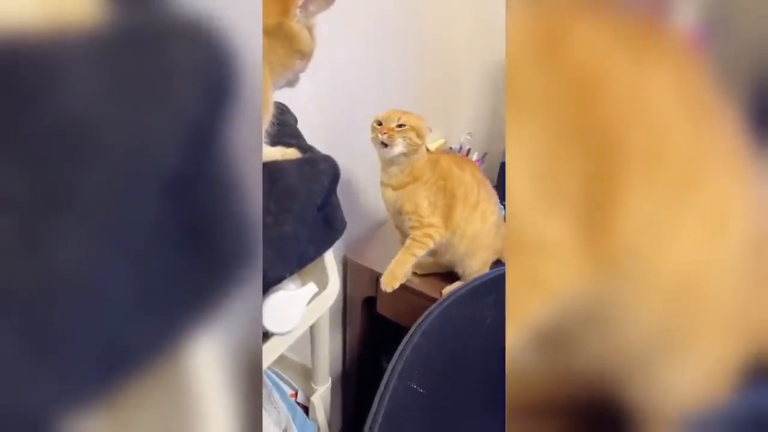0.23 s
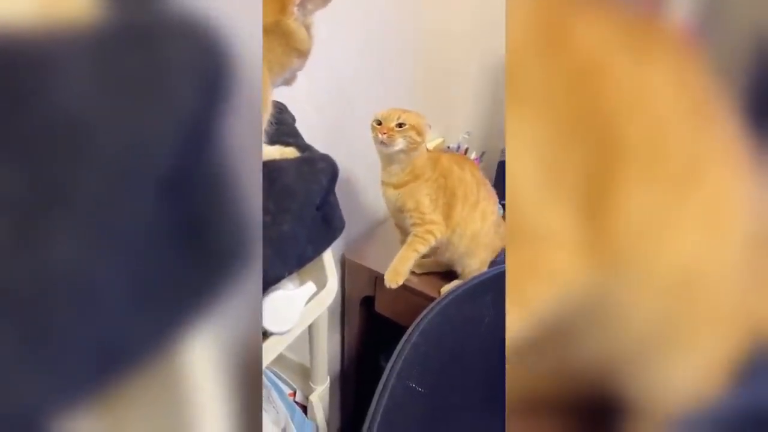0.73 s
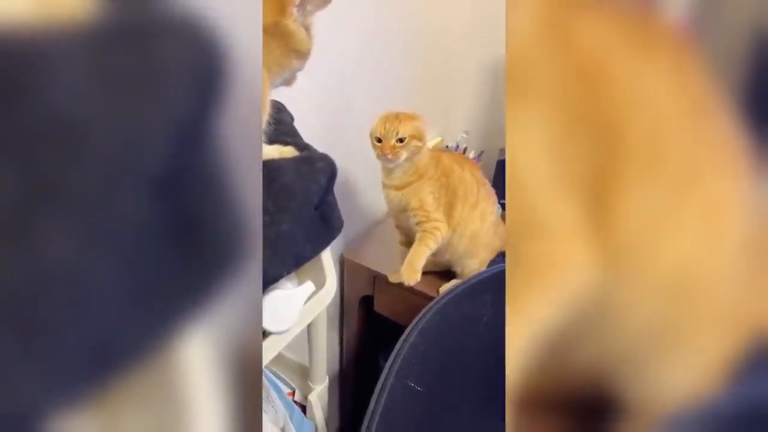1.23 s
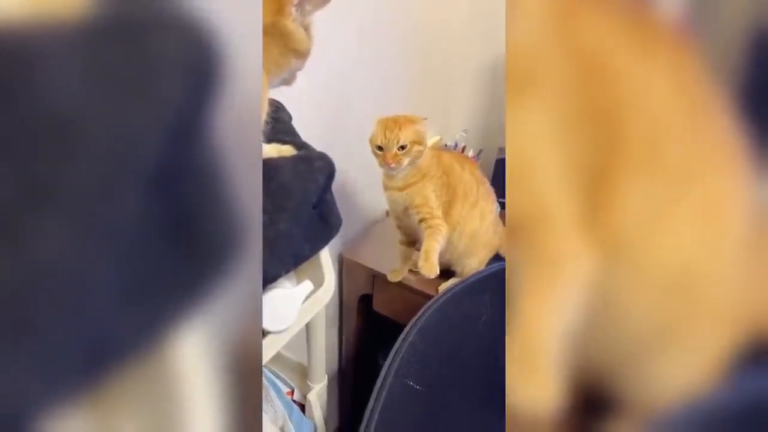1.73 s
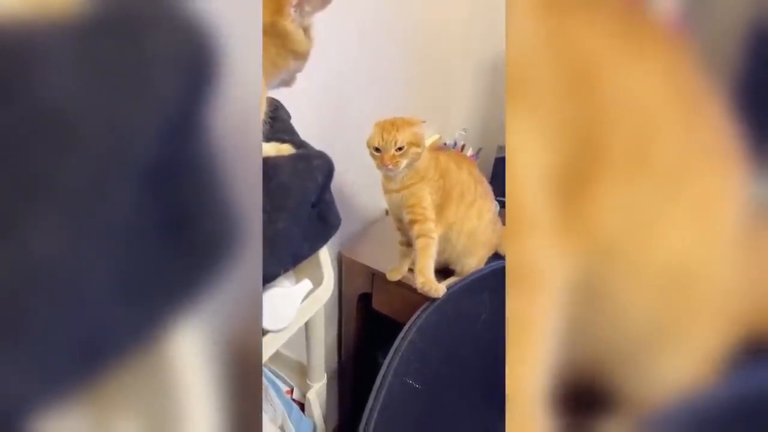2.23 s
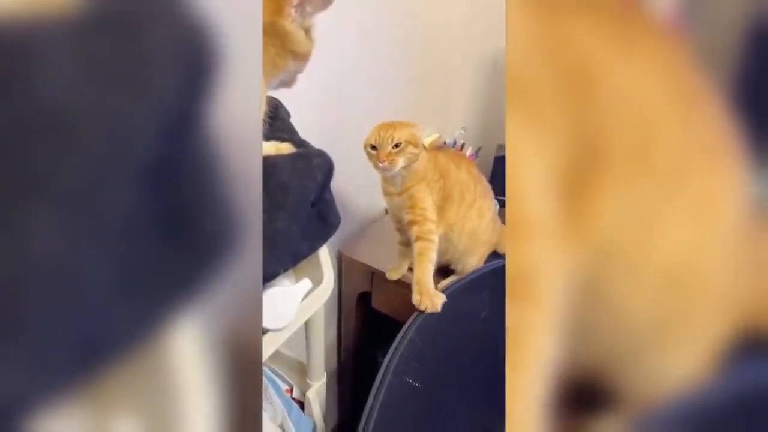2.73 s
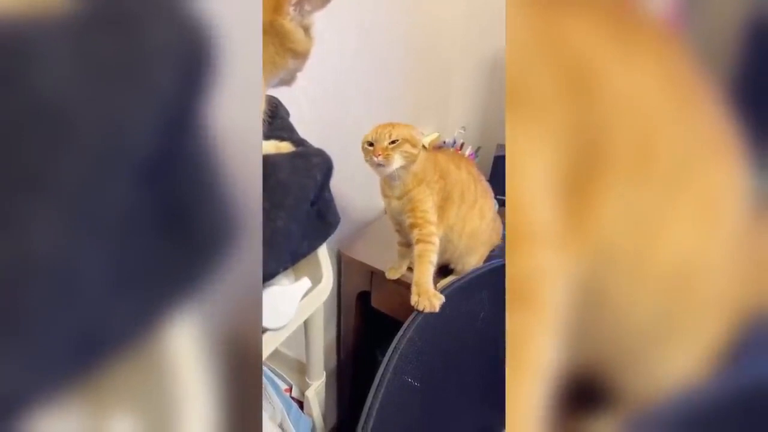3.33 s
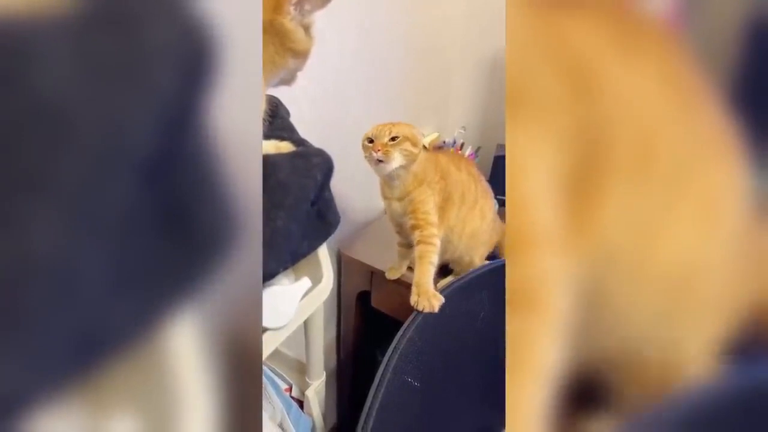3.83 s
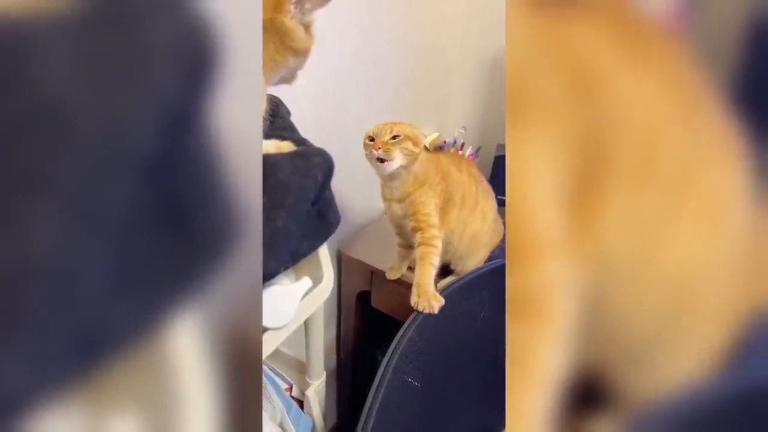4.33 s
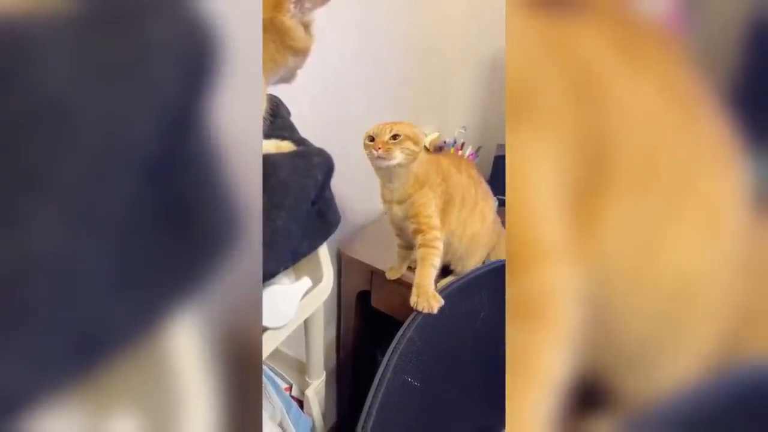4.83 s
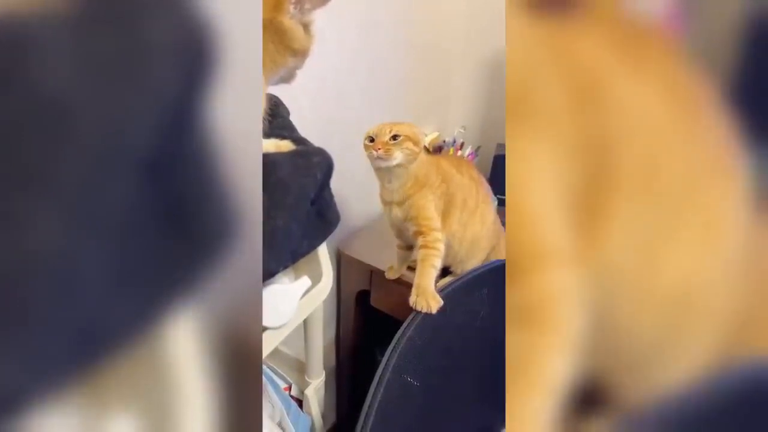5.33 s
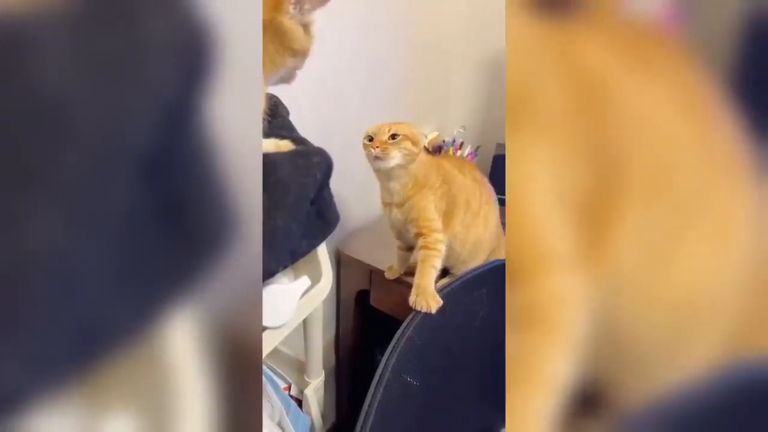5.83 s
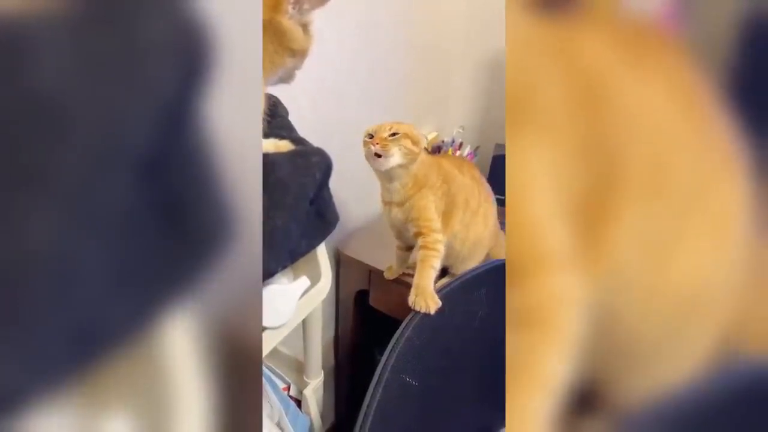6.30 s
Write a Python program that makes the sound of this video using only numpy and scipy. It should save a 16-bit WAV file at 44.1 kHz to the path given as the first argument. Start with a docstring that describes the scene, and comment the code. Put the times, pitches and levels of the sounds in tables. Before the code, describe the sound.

Indoors and close up, one cat growls low while another lets out long rising yowls, with paw taps on hollow wood and scuffs.

```python
"""One cat lets out long yowls that open into bright overtones: sums of partials shaped by mouth resonances,
with breath noise puffed once a cycle. A second cat growls low through a shut mouth as slow pulses.
Both are indoors, close to the microphone. Paws ring hollow wood and scuff in puffs of noise; low thuds, small
ticks and a faint squeak fall among them, over filtered-noise room tone. The sound drops out briefly."""
import sys
import numpy as np
from scipy import signal
from scipy.fft import rfft, irfft, next_fast_len
from scipy.io import wavfile
from scipy.ndimage import uniform_filter1d, minimum_filter1d

SR = 44100
rng = np.random.default_rng(int(sys.argv[2]) if len(sys.argv) > 2 else 0)


def wrap_up_sound(samples):
    """Save the sound to the file named by the first command line argument, as 16-bit audio."""
    columns = np.atleast_2d(samples).T
    # keep every value between -1 and 1, then stretch to whole-number steps
    tamed = np.clip(columns, -1, 1)
    steps = np.round(tamed * 32767).astype(np.int16)
    wavfile.write(sys.argv[1], SR, steps)


N = 289472

# Room tone in three bands: time_s, rumble_db, hush_db, treble_db
ROOM_TONE = [(0, -56, -41, -66.5), (1.06, -50, -41.5, -68.5), (1.83, -47.5, -54, -56),
             (2.1, -43, -53, -62.5), (3.2, -49, -48.5, -75.5), (4.81, -55, -43.5, -75.5),
             (5.61, -57.5, -64.5, -65), (6.23, -44, -35.5, -52), (6.57, -54, -81, -51)]
# Spectra of those bands: frequency_hz, relative_level_db
RUMBLE_SPECTRUM = [(20, -39.5), (35, -26), (52, -1.5), (80, -4.5), (120, 0.5), (250, -10.5), (500, -51)]
HUSH_SPECTRUM = [(260, -2.5), (450, -5), (550, -13), (660, -14), (969, -21), (1740, -28.5), (1860, -38.5),
                 (2630, -24.5), (3300, -55.5), (4290, -75.5), (7260, -120)]
TREBLE_SPECTRUM = [(2500, -41), (3300, 0), (8000, 3), (15500, -6)]
ECHO_DB, ECHO_T60_S = -13, .3

# Small short ticks: start_s, tone_peak_db, pitch_hz
TICKS = [(0.781, -34.5, 2880), (0.952, -31, 2065), (3.456, -28, 1570), (3.87, -42.5, 7760)]
TICK_T60_S = .009
# Faint falling squeak: time_s, pitch_hz, level_db
SQUEAK = [(.965, 3200, -55), (.995, 2800, -55), (1.02, 2350, -49), (1.05, 2050, -68)]

# Paw taps on hollow wood: start_s
TAP_STARTS = [0.02, 0.112, 0.249, 0.442, 0.735, 0.922, 1.046]
TAP_DB, TAP_RISE_S = -19.5, .0015  # peak before the rise
# Modes of the wooden panel before a random spread: pitch_hz, relative_level_db, t60_s
WOOD_MODES = [(514, -7, 0.14), (553, 7, 0.012), (710, -9.5, 0.038), (950, -17.5, 0.11), (1250, -7.5, 0.015),
              (1470, -19, .03)]
# Scuffs of paws and cloth, and in the last two rows low rumbling thuds under the last yowl;
# levels before decay: start_s, thud_db, swish_db, t60_s
SCUFFS_AND_THUDS = [(1.354, -58, -41.5, 0.43), (1.688, -47, -31.5, .08), (2.051, -24, -30, 0.17),
                    (2.2, -42, -30, 0.097), (2.403, -29.5, -21.5, 0.14), (2.436, -41, -26.5, .12),
                    (2.465, -47, -31, 0.25), (2.526, -37, -25, 0.092), (2.545, -22, -34, 0.31),
                    (2.641, -36, -31, 0.13), (2.696, -37, -14.5, 0.034), (2.736, -18.5, -23, 0.12),
                    (2.935, -25, -65, 0.29), (4.79, -26.5, -24, 0.14), (4.922, -50, -28, 0.13),
                    (5.11, -52, -32, 0.087), (5.927, -30, -80, 0.52), (6.171, -38, -70, 0.4)]
PUFF_RISE_S = .012
# Spectra of the low and high part of a puff: frequency_hz, relative_level_db
THUD_SPECTRUM = [(40, -29), (120, 9), (300, -0.5), (500, -2.5), (900, -29), (2000, -56)]
SWISH_SPECTRUM = [(300, -7.5), (1500, -6), (3000, -9.5), (6000, -12.5), (12000, -19), (15500, -18.5)]

# One table a growl: time_s, second_partial_hz (twice the pulse rate), its level_db, other_partials_db (re it)
GROWLS = [
    [(0.0, 149.7, -19.5, -12.5), (1.15, 148.7, -20, -12), (1.29, 130.5, -40.5, -2),
     (1.65, 124, -41.5, -1.5), (1.82, 122, -54.5, 4.5), (1.98, 125.3, -37.5, -2), (2.17, 129.5, -42, 2.5),
     (2.3, 121, -72, -13)],
    [(3.24, 124.3, -44, -25.5), (3.272, 128.1, -30, -7.5), (3.704, 131.6, -24.5, -11),
     (4.132, 138.6, -21.5, -15), (4.234, 128, -33, -3), (4.742, 126.1, -36.5, -0.5),
     (4.85, 119.7, -46, 3.5), (5.05, 119.6, -36.5, -3), (5.16, 117, -60, -10)],
]
# Spectrum of the chest and shut mouth: frequency_hz, relative_level_db
CHEST_SPECTRUM = [(50, -31.5), (75, -14), (200, 7), (290, -3.5), (380, 1.5), (460, -23.5), (700, -39),
                  (1500, -33), (2500, -48.5)]

# Air hiss before a yowl, level before the swell: start_s, end_s, level_db
INTAKES = [(1.085, 1.191, -20.5), (4.024, 4.185, -26)]
# Upper resonances of the parting mouth: frequency_hz, width_hz, relative_level_db
PARTING_RESONANCES = [(2270, 210, 8), (4240, 240, -7), (5860, 520, -10.5), (7650, 690, -21)]

# One table a yowl; the last two tables overlap and form one yowl whose mouth colour changes: time_s, pitch_hz,
# # jaw_hz (first mouth resonance), voice_db, fundamental_db, overtones_db, breath_db (re the voice as a whole)
YOWLS = [
    [(1.125, 349.3, 1093, -22.5, -23, -31.5, -19), (1.157, 370, 1150, -13.5, -17.5, -38, -17),
     (1.185, 428, 1314, -16, -36.5, -38, -12), (1.228, 484, 1139, -18, -27, -39.5, -26),
     (1.31, 514, 1142, -13, -27.5, -39.5, -24.5), (1.42, 509.3, 1074, -16.5, -34.5, -45, -32),
     (1.47, 497.3, 1040, -13.5, -28.5, -48, -32), (1.51, 513, 1040, -18.5, -31, -50.5, -31),
     (1.68, 521, 997, -11.5, -31, -47.5, -41), (1.72, 509.3, 1050, -16, -34.5, -49.5, -36),
     (1.82, 512.3, 1014, -14.5, -34.5, -52.5, -42), (1.91, 531.3, 1200, -13.5, -35.5, -41, -36.5),
     (2.02, 541.4, 1330, -15, -27.5, -40.5, -41.5), (2.24, 556.4, 1420, -11, -28, -32, -34.5),
     (2.423, 566.6, 1686, -10, -38, -38, -30.5), (2.557, 562.8, 1609, -10.5, -35.5, -42, -36),
     (2.65, 539.4, 1485, -16.5, -33.5, -40.5, -26), (2.77, 550, 1107, -33.5, -27.5, -52.5, -30),
     (2.895, 518.2, 1050, -32, -23.5, -61, -48.5), (3.02, 527, 1058, -38.5, -25, -67.5, -36.5),
     (3.065, 557, 1050, -71.5, -40, -89, -33.5), (3.12, 564, 1030, -81, -63.5, -91, -26.5)],
    [(4.112, 370, 1130, -26.5, -20.5, -41, -28), (4.14, 360.7, 1210, -17.5, -18, -40, -18),
     (4.18, 419.4, 1255, -18.5, -23, -43, -27), (4.215, 473.6, 1150, -21, -34.5, -42, -27),
     (4.258, 503, 1043, -16, -24, -46, -32.5), (4.342, 520.8, 1130, -14.5, -30.5, -37, -29.5),
     (4.44, 526.2, 1350, -17, -26.5, -35, -11), (4.48, 533.8, 1144, -10, -40, -34.5, -20),
     (4.592, 540, 1510, -18, -34, -32.5, -12), (4.645, 552.6, 1400, -12, -26, -32.5, -17),
     (4.714, 578.2, 1390, -13.5, -35, -30.5, -13.5), (4.818, 610.7, 1760, -12.5, -34.5, -32.5, -25),
     (5.038, 614.2, 1775, -10, -38.5, -30, -44), (5.176, 604.8, 1775, -12.5, -39, -27, -38),
     (5.402, 639, 1900, -8, -43, -26.5, -51.5), (5.594, 613.2, 1823, -11, -41.5, -27, -44.5),
     (5.686, 589.5, 1525, -18.5, -40.5, -34.5, -40), (5.774, 559.5, 1350, -11.5, -32.5, -27.5, -20.5),
     (5.875, 580.7, 1220, -26, -37, -44.5, -30)],
    [(5.925, 299.8, 950, -35, -48, -42, -24.5), (5.95, 306.6, 1026, -31, -47, -38.5, -25),
     (6.061, 315, 1003, -27, -51, -42.5, -20), (6.161, 332.2, 1274, -24.5, -52, -36.5, -23),
     (6.217, 347, 1200, -28, -55, -30.5, -12), (6.28, 388, 1690, -37, -50, -32, -8.5),
     (6.33, 422, 1880, -33.5, -69, -28.5, -4), (6.37, 437, 1900, -58, -65, -56, -8)],
    [(6.31, 472.3, 1000, -43, -60, -15, -14), (6.355, 486.4, 995, -35, -57, -24, -12),
     (6.4, 488, 1000, -32, -49, -22, -16), (6.478, 509.4, 1050, -35, -53.5, -20.5, -15),
     (6.564, 513, 1060, -40, -48, -21.5, -11.5)],
]
# Highest of the low partials in each table, shaped by the jaw and tongue resonances: partial_number
LOW_PARTIALS = [5, 5, 4, 3]
# Strong and weak cycles alternate, giving lines at half pitch: start_db, end_db (re their neighbours)
PAIRING = [(-60, -60), (-60, -60), (-34, -6), (3, 8)]
# Overtone colour of the mouth, one a table: frequency_hz, relative_level_db
MOUTHS = [
    [(1290, -46), (2200, -16), (2510, -15), (2790, 3), (3200, -27), (4000, -28), (4550, -13), (5150, -12),
     (6060, -36), (7250, -19), (9340, -35), (13800, -38), (15500, -42)],
    [(1350, -29), (2300, 1), (3800, -13), (4050, -25), (4640, -29), (5670, -12), (6870, -29), (8790, -37),
     (9370, -29), (10600, -28), (12000, -45), (13800, -39), (15500, -58)],
    [(1400, -10), (1850, -17), (2150, 0), (2550, 0), (3000, -12), (3500, -16), (4200, -28), (9000, -40),
     (15500, -50)],
    [(1500, -22), (1850, -18), (2250, 2), (2550, -8), (2800, -1), (3020, -16), (3300, -2), (3850, 0),
     (4400, -6), (4800, -14), (5600, -26), (8000, -44), (15500, -60)],
]
# First mouth resonance at which each colour holds unshifted: jaw_hz
MOUTHS_AT_HZ = [1377, 1910, 990, 1062]
# Faint noise standing in for the highest overtones of each table, at its loudest voice: level_db
TOP_DB = [-56.5, -48, -65, -51]
# Noise among the overtones of each table, before the breath adds its share: relative_level_db
FIZZ_DB = [-2, -5, -4.5, -6]
# Fade-in of each table: rise_s
RISES_S = [.003, .003, .003, .05]
# Second mouth resonance, set by the tongue: time_s, tongue_hz, level_db (re the first)
TONGUE = [(1.13, 1890, -18), (1.2, 2020, -13), (1.32, 2000, -21), (1.5, 2380, -11), (1.799, 2427, -15),
          (2.0, 2263, -15.5), (2.24, 2410, -16.5), (2.449, 2800, -11.5), (2.65, 2500, -15.5),
          (2.8, 2070, -1.5), (2.87, 2200, -35), (4.12, 1900, -16.5), (4.25, 2070, -16), (4.5, 2360, -14),
          (4.72, 2584, -17.5), (5.04, 2550, -6), (5.399, 2620, -10), (5.6, 2848, -6), (5.75, 2220, -27.5),
          (5.93, 2180, -6), (6.56, 2300, -1)]
# Spectra of the breath and of the noise for the highest overtones: frequency_hz, relative_level_db
BREATH_SPECTRUM = [(150, 1.5), (400, -10.5), (1000, -6), (1400, 1.5), (2500, 8), (3300, -10.5),
                   (5000, -39.5), (15000, -62.5)]
TOP_SPECTRUM = [(7000, -26.5), (8500, -3.5), (10000, 0), (12000, -20.5), (13000, -1.5), (14500, -5),
                (15500, -3)]
TOP_FOLLOWS = 1  # dB of that noise gained per dB of voice
STRETCH = 0.56  # power by which the overtone colour follows the first resonance
JAW_WIDTH_HZ, JAW_STEEPNESS, TONGUE_WIDTH_HZ = 247, 1.455, 563
TILT_DB = -1.5  # slope of the source per octave
# pitch scatter cycle to cycle (share of the pitch): steady, added by breath, added at the onset; settling time
STEADY_SCATTER, BREATHY_SCATTER, ONSET_SCATTER, SETTLE_S = .0018, .013, .013, .07
WAVER = .003  # slow drift, share of the pitch

# Brief silence: start_s, end_s, fade_in_s
DROPOUT = (5.873, 5.926, 0.0086)
LIMIT_DB, EDGE_HZ = -3.8, 15700  # limiter threshold; top of the band


def amp(db):
    """Amplitude of a level in dB."""
    return 10 ** (np.asarray(db) / 20)


def evened(x):
    """Scales x to rms 1."""
    return x / np.sqrt(np.mean(x ** 2) + 1e-20)


def read(points, hz):
    """Reads a spectrum in dB at hz, along a log frequency axis."""
    f, value = np.transpose(points)
    return np.interp(np.log(hz + 1), np.log(f + 1), value)


def add(mix, s, sound):
    """Adds a sound into the mix from s seconds on."""
    part = mix[round(s * SR):][:len(sound)]
    part += sound[:len(part)]


def coloured(x, points):
    """Filters x by a spectrum in dB; rms 1."""
    size = next_fast_len(len(x))
    gain = amp(read(points, np.fft.rfftfreq(size, 1 / SR)))
    return evened(irfft(rfft(x, size) * gain, size)[:len(x)])


def wander(length, size):
    """Smooth random drift of rms 1."""
    once = uniform_filter1d(rng.standard_normal(length), size)
    return evened(uniform_filter1d(once, size))


def played(rows):
    """Start time and the columns of a table at every sample."""
    s, *columns = np.transpose(rows)
    t = np.arange(s[0], s[-1], 1 / SR)
    return s[0], [np.interp(t, s, c) for c in columns]


def resonate(x, hz, width):
    """Shifts the curve hz down to zero, smooths, and shifts back: a resonance of gain 1."""
    turn = np.exp(2j * np.pi * np.cumsum(hz * np.ones(len(x))) / SR)
    r = np.exp(-np.pi * width / SR)
    return 2 * (turn * signal.lfilter([1 - r], [1, -r], x / turn)).real


def room_tone():
    """Low rumble, a dull hush and faint treble hiss: three bands of filtered noise."""
    out = np.zeros(N)
    _, levels = played(ROOM_TONE)
    for db, spectrum in zip(levels, (RUMBLE_SPECTRUM, HUSH_SPECTRUM, TREBLE_SPECTRUM)):
        add(out, 0, amp(db) * coloured(rng.standard_normal(len(db)), spectrum))
    return out


def echo(x):
    """A small furnished room: a short, dull, decaying tail of random reflections."""
    t = np.arange(SR // 2) / SR
    reflections = coloured(rng.standard_normal(len(t)), [(100, -6.5), (2000, -4.5), (10000, -10.0)])
    tail = reflections * amp(-60 * t / ECHO_T60_S) * (t > .006)
    return signal.oaconvolve(x, tail / np.linalg.norm(tail))[:N]


def ticks():
    """Short decaying tones with a broad noise snap, and one squeak of narrow noise."""
    out, t = np.zeros(N), np.arange(SR // 10) / SR
    for s, db, hz in TICKS:
        decay = amp(-60 * t / 0.0092) + 0.19 * amp(-60 * t / .09)
        snap = signal.lfilter([.4], [1, -.6], 0.29 * rng.standard_normal(len(t)) * decay)
        tone = np.sin(2 * np.pi * hz * t) * amp(-60 * t / TICK_T60_S)
        add(out, s, amp(db) * (tone + snap))
    s, (hz, db) = played(SQUEAK)
    add(out, s, amp(db) * evened(resonate(rng.standard_normal(len(hz)), hz, 60)))
    return out


def taps():
    """Paw taps ring the modes of a hollow wooden panel: a sum of decaying sines."""
    out, t = np.zeros(N), np.arange(SR // 4) / SR
    for s in TAP_STARTS:
        # every tap excites and tunes the modes a little differently
        chance = rng.random((len(WOOD_MODES), 2))
        ring = sum(amp(level - 60 * t / t60 + 5.8 * a) * np.sin(2 * np.pi * hz * (.95 + 0.07 * b) * t)
                   for (hz, level, t60), (a, b) in zip(WOOD_MODES, chance))
        add(out, s, amp(TAP_DB) * ring / abs(ring).max() * np.minimum(t / TAP_RISE_S, 1))
    return out


def scuffs_and_thuds():
    """Dying puffs of low noise and grainy high noise; the rumbling thuds are nearly all low noise."""
    out, t = np.zeros(N), np.arange(SR // 4) / SR
    for s, thud_db, swish_db, t60 in SCUFFS_AND_THUDS:
        low, high = rng.standard_normal((2, len(t)))
        grains = high * amp(4 * wander(len(t), size=60))
        puff = amp(thud_db) * coloured(low, THUD_SPECTRUM) + amp(swish_db) * coloured(grains, SWISH_SPECTRUM)
        add(out, s, puff * amp(-60 * t / max(t60, .01)) * np.minimum(t / PUFF_RISE_S, 1))
    return out


def growl(rows, jitter=0.017, wobble_db=1.0, rasp_db=-10):
    """Slow pulses through a shut mouth: the second partial sits on the chest resonance and stands out."""
    s, (hz, db, rest_db) = played(rows)
    length = len(hz)
    turns = np.cumsum(hz / 2 * (1 + jitter * wander(length, size=300))) / SR
    hum = np.sqrt(2) * np.cos(4 * np.pi * turns) * amp(wobble_db * wander(length, size=250))
    rest = sum(amp(2.5 * wander(length, size=1200)) * np.cos(2 * np.pi * (k * turns + .07 * k * k))
               for k in range(1, 14) if k != 2)
    # noise bursts once a pulse
    rasp = (0.22 + np.exp(-(turns % 1) / 0.16)) * rng.standard_normal(length)
    body = coloured(rest, CHEST_SPECTRUM) + amp(rasp_db) * coloured(rasp, CHEST_SPECTRUM)
    return s, amp(db) * (hum + amp(rest_db) * body) * signal.windows.tukey(length, .005)


def intake(start, end, db):
    """Air noise swells in the upper resonances of the parting mouth."""
    air = rng.standard_normal(round((end - start) * SR))
    hiss = sum(amp(level) * resonate(resonate(air, hz, width), hz, width)
               for hz, width, level in PARTING_RESONANCES)
    swell = np.linspace(0, 1, len(air))
    return start, amp(db) * evened(hiss) * swell ** 2 * np.minimum(6 * (1 - swell), 1)


def mouth_gain(hz, jaw_hz, tongue_hz, tongue_db):
    """Gain of the two lowest mouth resonances; between them the sound partly cancels."""
    first = (1 + 2j * (hz - jaw_hz) / JAW_WIDTH_HZ) ** -JAW_STEEPNESS
    second = amp(tongue_db) / (1 + 2j * (hz - tongue_hz) / TONGUE_WIDTH_HZ)
    return abs(first + second) * amp(TILT_DB * np.log2(hz / jaw_hz))


def yowl(rows, count, pairing, mouth, mouth_at_hz, top_db, fizz_db, rise_s,
         flutter_db=4, shimmer_db=1.5, ring_db=2, spread=0.01):
    """Partials of the vocal folds, breath puffed once a cycle, and lines at half pitch when cycles pair up."""
    s, (hz, jaw_hz, voice_db, hum_db, high_db, breath_db) = played(rows)
    t, half_hz = np.arange(len(hz)) / SR, hz / 2

    # the pitch scatters more while the voice sets in and when it turns breathy
    scatter = STEADY_SCATTER + BREATHY_SCATTER * amp(breath_db) + ONSET_SCATTER * np.exp(-t / SETTLE_S)
    drift = scatter * wander(len(t), size=120) + WAVER * wander(len(t), size=2000)
    pairs = np.cumsum(half_hz * (1 + drift)) / SR  # pairs of cycles so far
    paired = amp(np.linspace(*pairing, len(t)))

    when, *tongue = np.transpose(TONGUE)
    tongue = [np.interp(s + t, when, column) for column in tongue]
    shape = np.array([mouth_gain(k * hz, jaw_hz, *tongue) for k in range(2, count + 1)])
    gains = [amp(hum_db), *(amp(voice_db) * shape / np.linalg.norm(shape, axis=0))]
    low = 0
    for k, gain in enumerate(gains, 1):
        partial = np.cos(4 * np.pi * k * pairs + 1.1 * k * k)
        half_line = np.minimum(paired, .6) * np.cos(2 * np.pi * (2 * k - 1) * pairs + k)
        low = low + gain * amp(shimmer_db * wander(len(t), size=400)) * (partial + half_line)

    # overtones count in halves of the pitch; odd ones sound only when cycles pair up
    step = 1 if paired.max() > .01 else 2
    stretch = (mouth_at_hz / jaw_hz) ** STRETCH
    high, power = 0, 0
    for k in range(2 * count + step, 70, step):
        colour = amp(read(mouth, k * half_hz * stretch)) * (k * half_hz < EDGE_HZ)
        colour = colour * (paired if k % 2 else 1)
        # each overtone swells and fades on its own
        flutter = amp(flutter_db * wander(len(t), size=1600))
        high = high + colour * flutter * np.cos(2 * np.pi * (k * pairs + spread * k * k))
        power = power + colour ** 2

    effort = np.sqrt(amp(voice_db) ** 2 + amp(hum_db) ** 2 + amp(high_db) ** 2)
    puffs = (.5 + np.exp(-(2 * pairs % 1) / 0.46)) * rng.standard_normal((2, len(t)))
    breath = coloured(puffs[0], BREATH_SPECTRUM)
    breath = evened(breath + amp(ring_db) * evened(resonate(breath, jaw_hz, 170)))
    # the breathier the voice, the more fizz among the overtones
    fizz = amp(fizz_db + 0.28 * breath_db) * coloured(puffs[1], mouth)
    voice = np.sqrt(2) * (low + amp(high_db) * (high / np.sqrt(power) + fizz))
    # faint noise stands in for the highest overtones
    top = coloured(puffs[1], TOP_SPECTRUM) * amp(3 * wander(len(t), size=700))
    voice = voice + amp(top_db + TOP_FOLLOWS * (voice_db - voice_db.max())) * top
    onset, release = np.minimum(t / rise_s, 1), np.minimum(t[::-1] / .001, 1)
    return s, (voice + amp(breath_db) * effort * breath) * onset * release


def scene():
    """Yowls, intakes, taps, scuffs, thuds and ticks with their echo; growls without; room tone beneath."""
    echoed = taps() + scuffs_and_thuds() + ticks()
    for row in zip(YOWLS, LOW_PARTIALS, PAIRING, MOUTHS, MOUTHS_AT_HZ, TOP_DB, FIZZ_DB, RISES_S):
        add(echoed, *yowl(*row))
    for row in INTAKES:
        add(echoed, *intake(*row))
    near = echoed + amp(ECHO_DB) * echo(echoed)
    for rows in GROWLS:
        add(near, *growl(rows))
    return (near + room_tone())[None]


def record(dry):
    """A limiter holds the loudest swells down; the sound drops out and fades back in; then the band limit."""
    crest = uniform_filter1d(-minimum_filter1d(-abs(dry), size=600), size=500)
    held = dry / np.maximum(crest / amp(LIMIT_DB), 1) ** .85
    t = np.arange(N) / SR
    start, end, fade = DROPOUT
    before, after = np.clip((start - t) / 0.00064, 0, 1), np.clip((t - end) / fade, 0, 1)
    gated = held * np.maximum(before, after)
    lowpass = signal.firwin(511, EDGE_HZ, window=("kaiser", 9), fs=SR)
    return signal.oaconvolve(gated, lowpass[None], "same")


dry = scene()
out = record(dry)
wrap_up_sound(out)
```